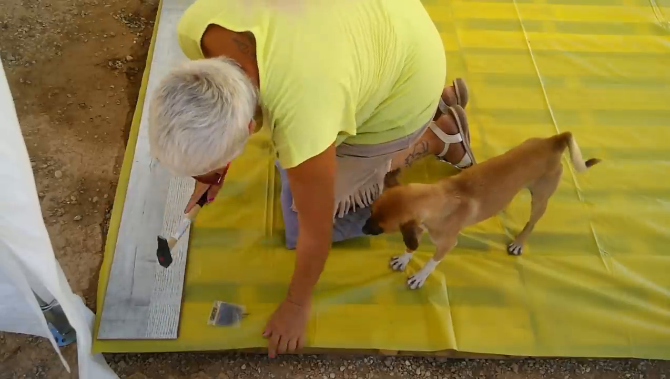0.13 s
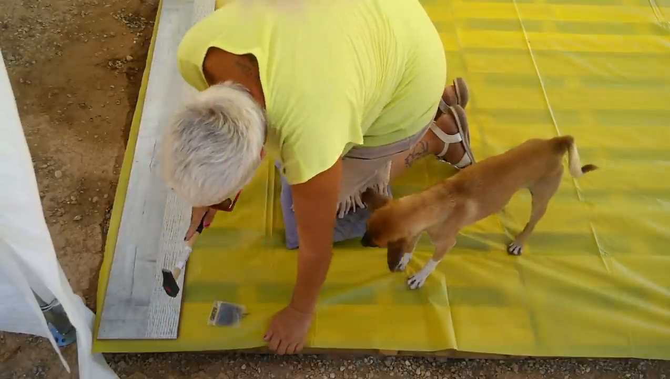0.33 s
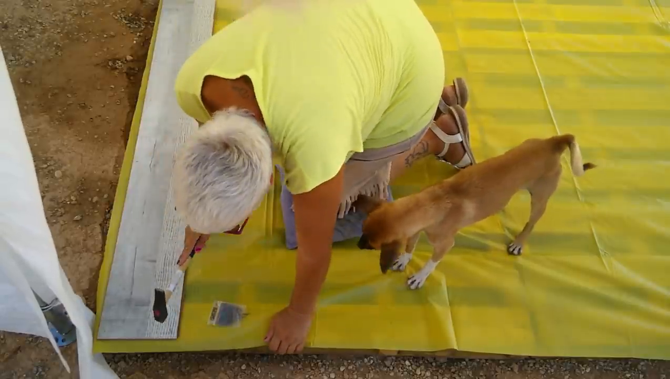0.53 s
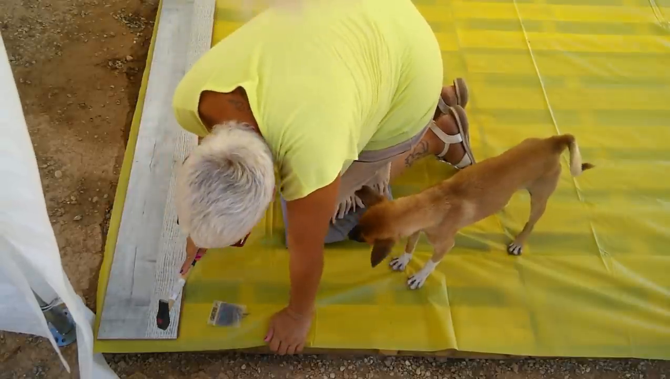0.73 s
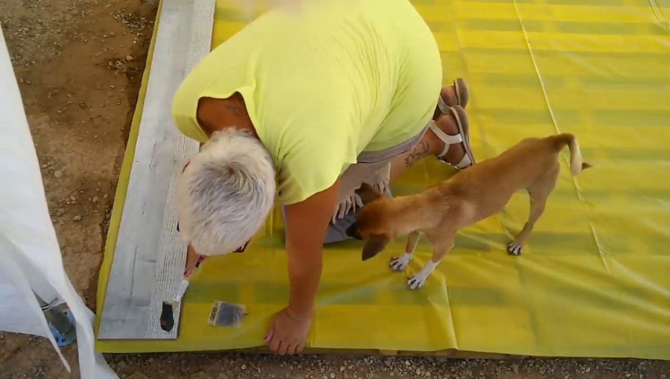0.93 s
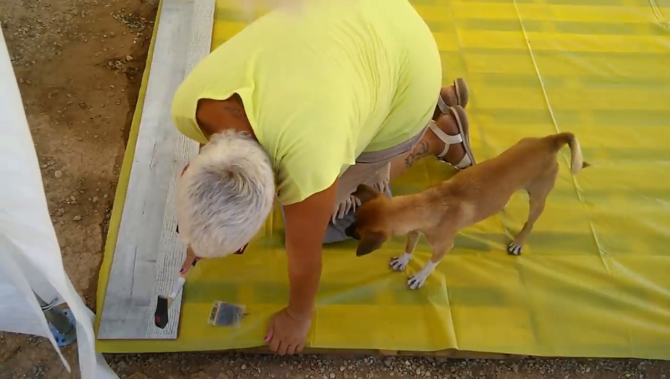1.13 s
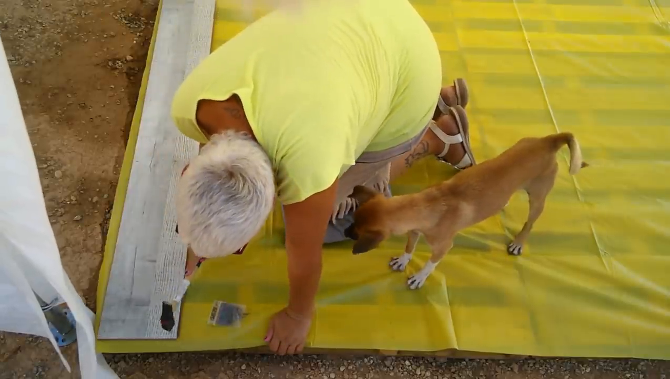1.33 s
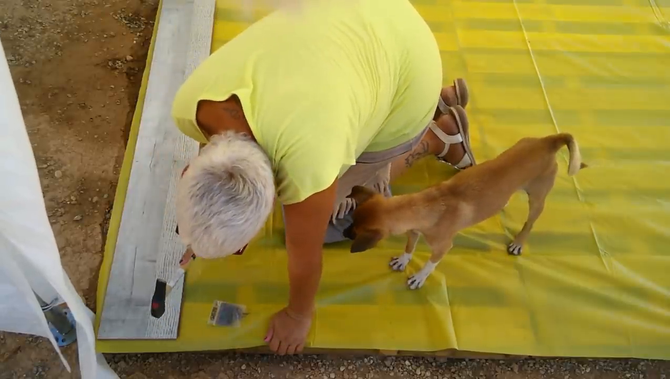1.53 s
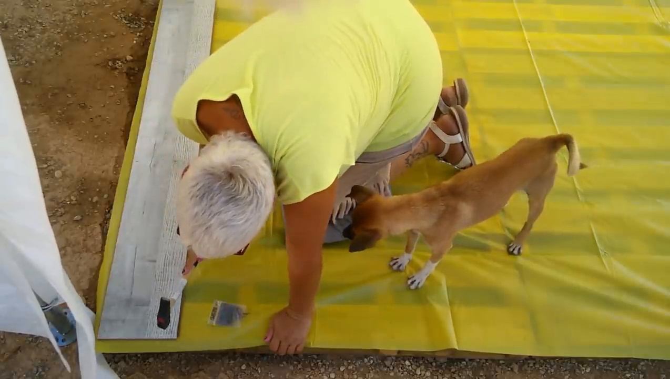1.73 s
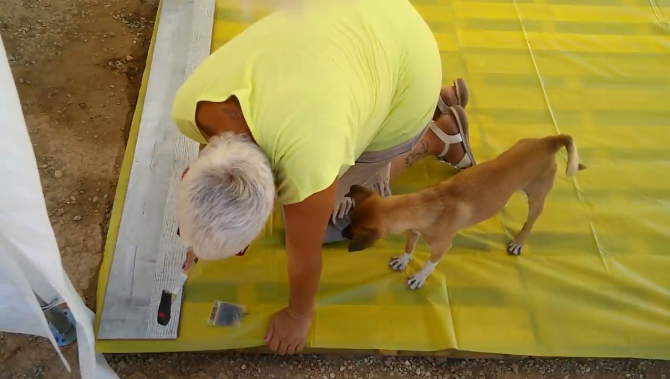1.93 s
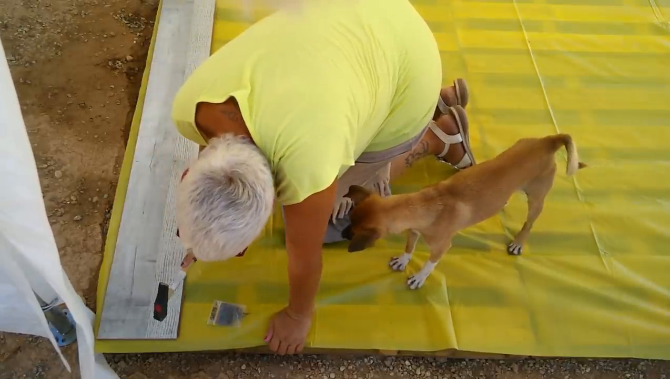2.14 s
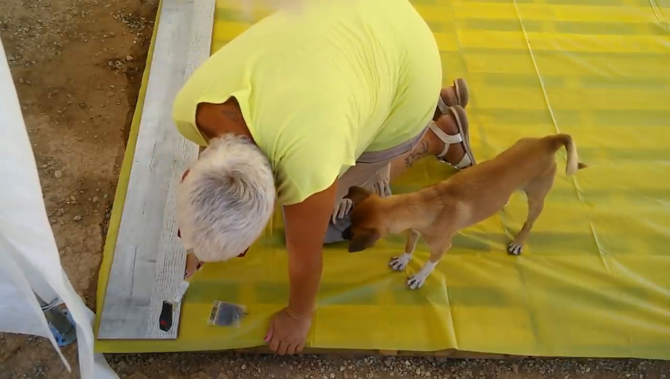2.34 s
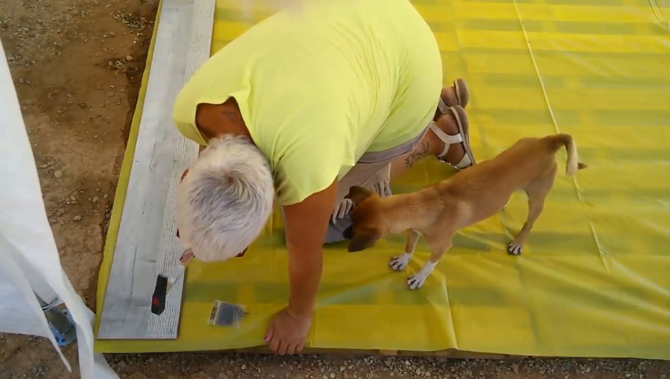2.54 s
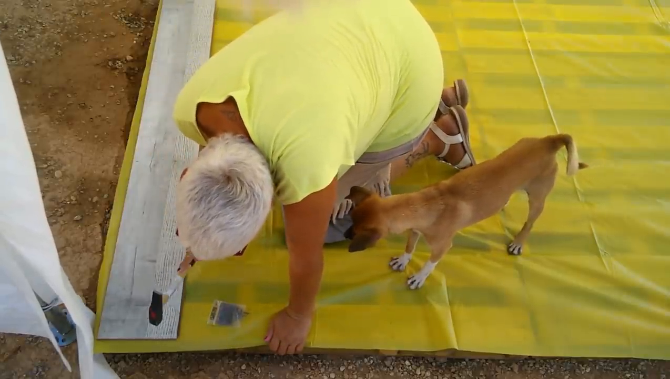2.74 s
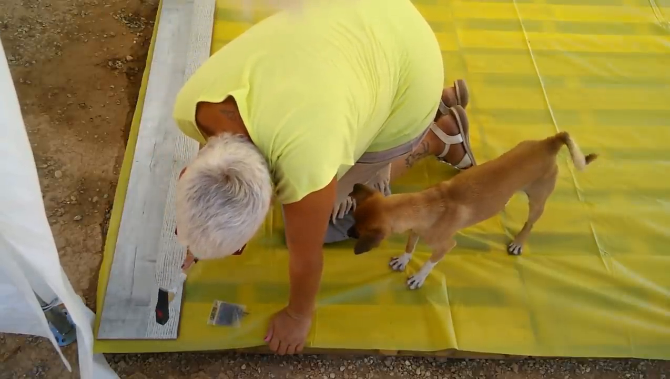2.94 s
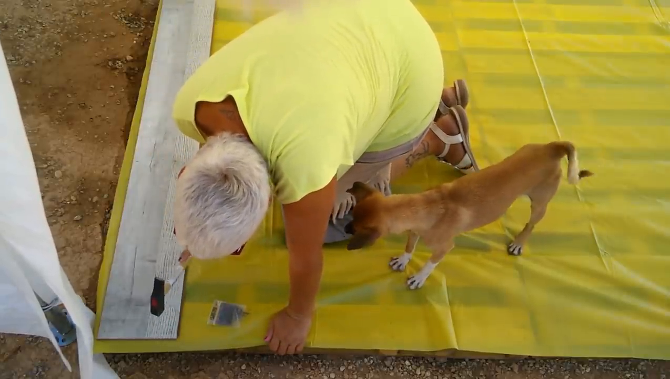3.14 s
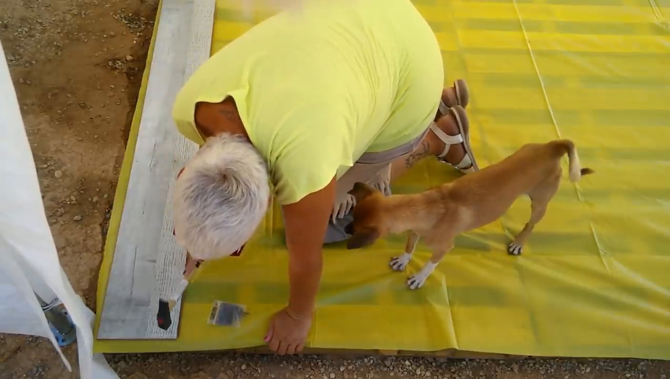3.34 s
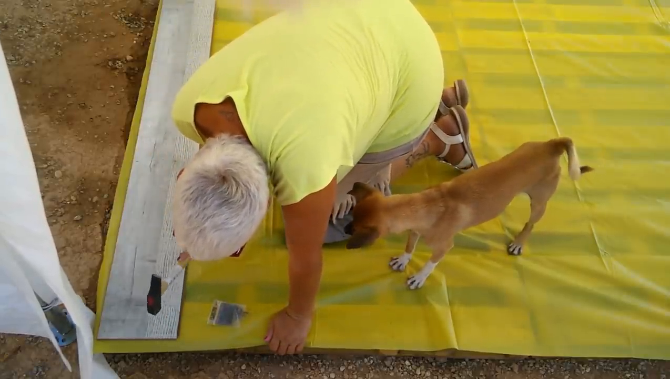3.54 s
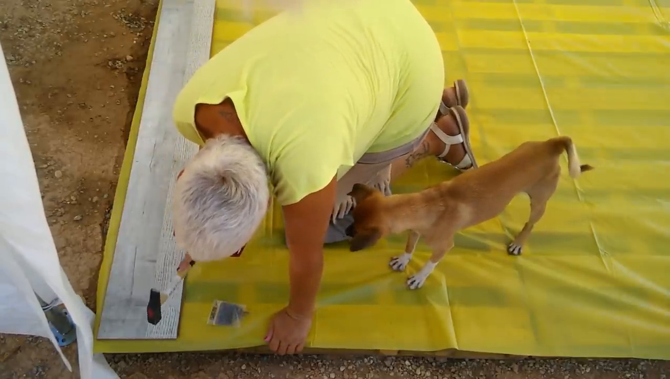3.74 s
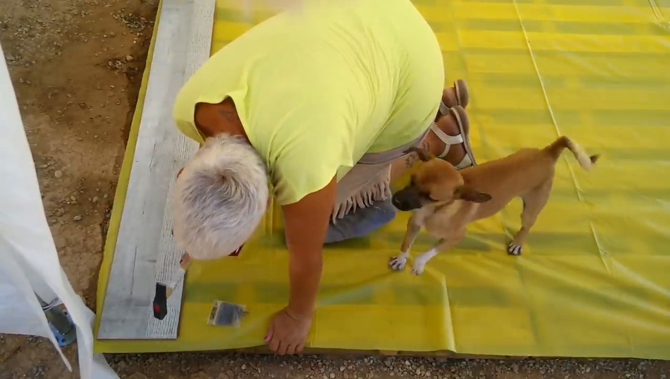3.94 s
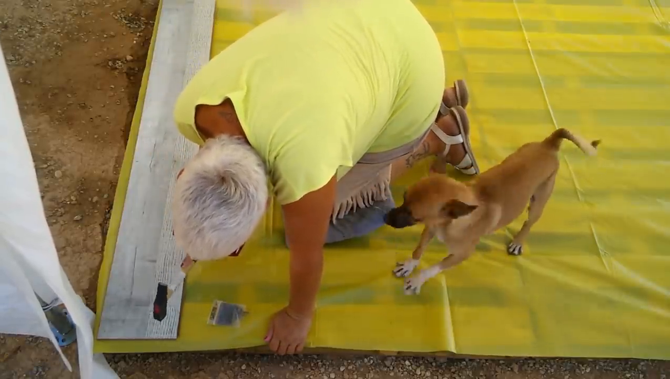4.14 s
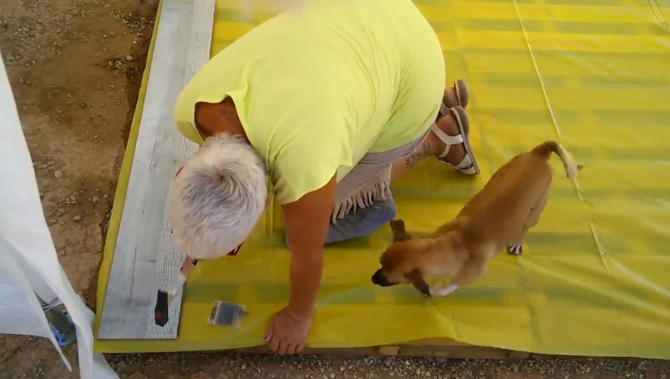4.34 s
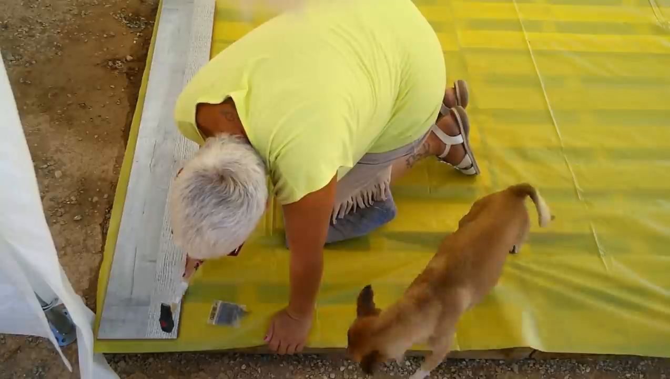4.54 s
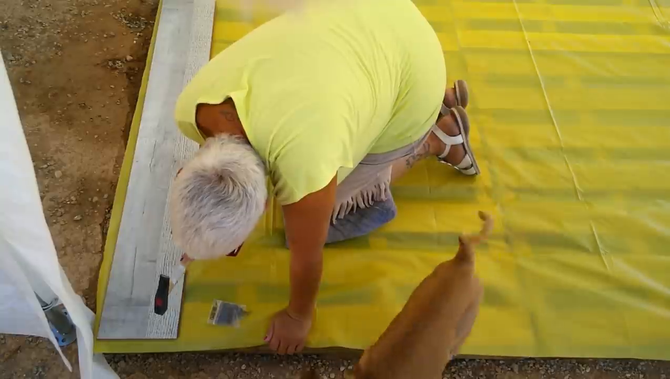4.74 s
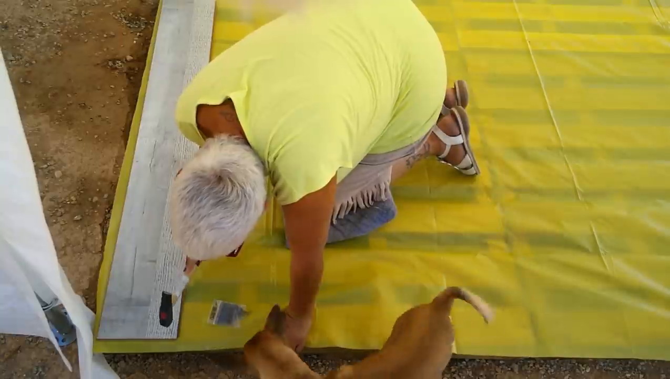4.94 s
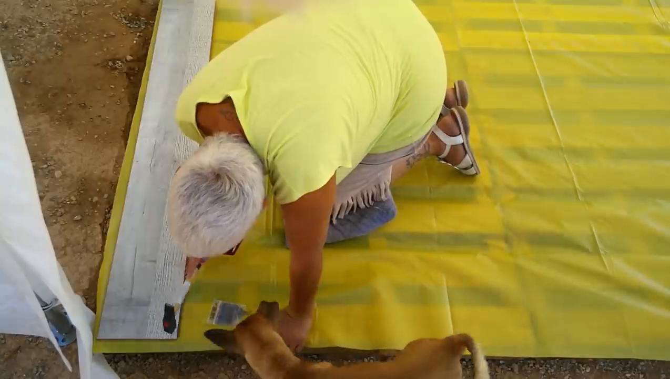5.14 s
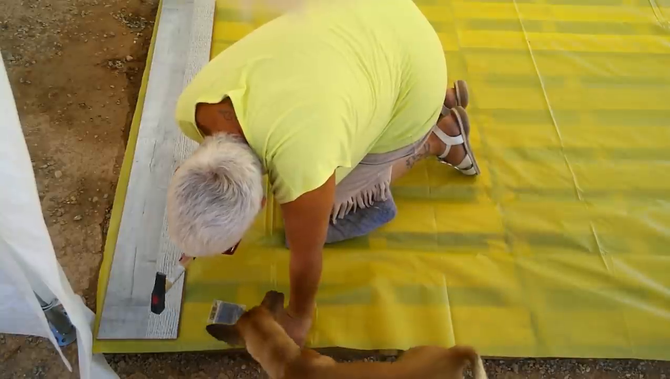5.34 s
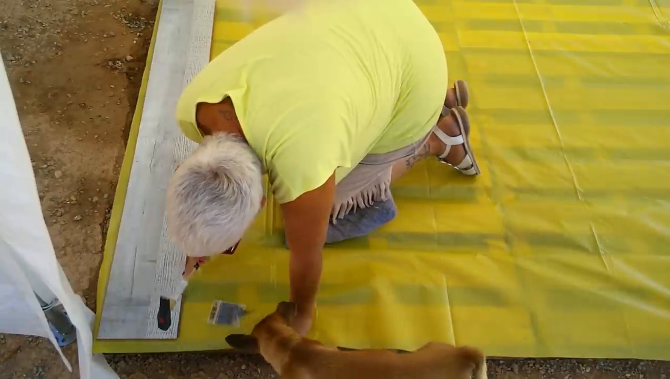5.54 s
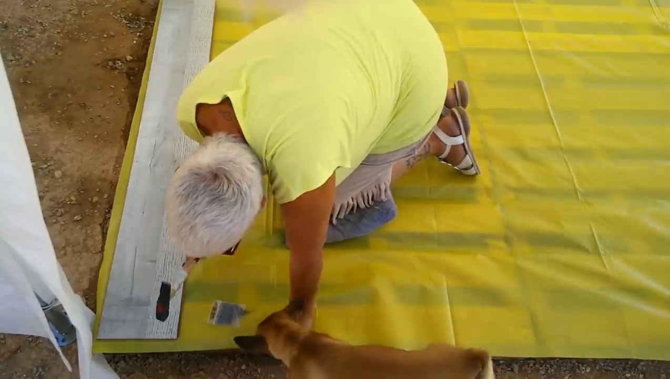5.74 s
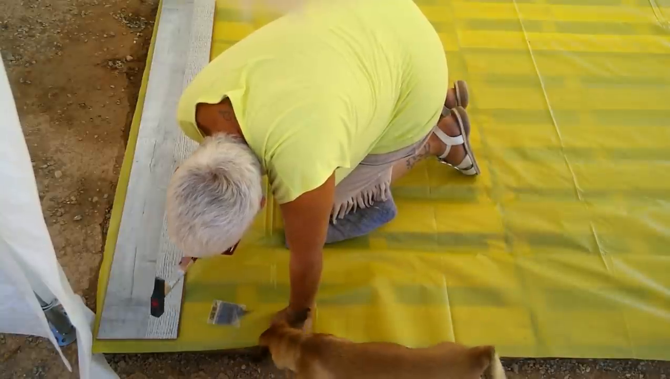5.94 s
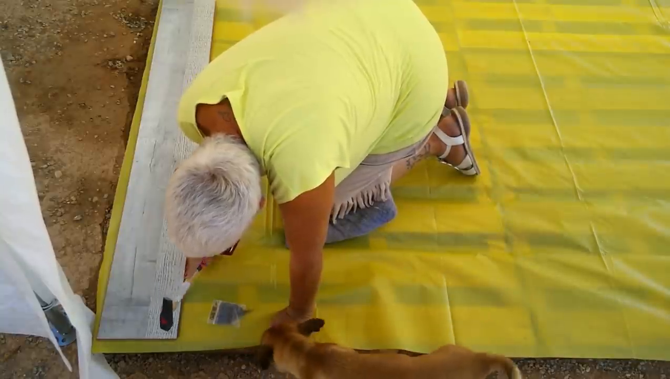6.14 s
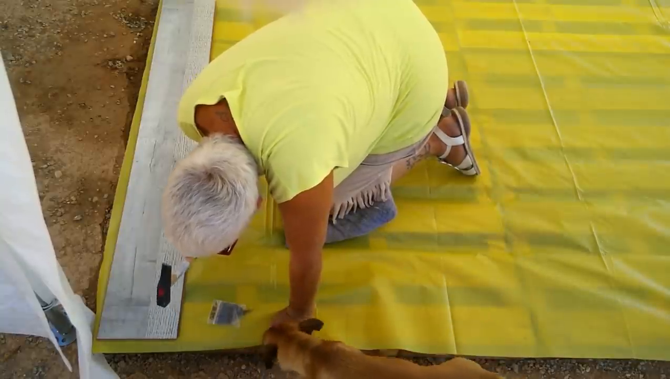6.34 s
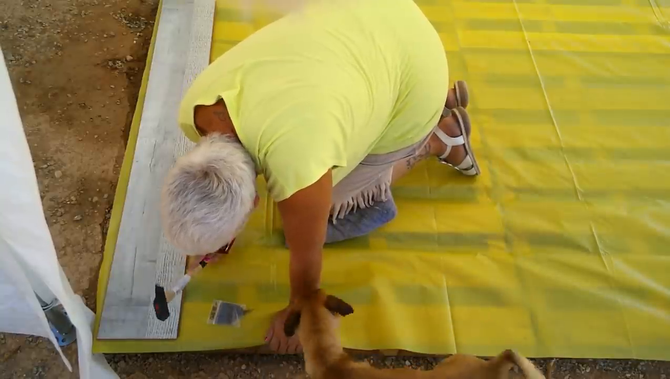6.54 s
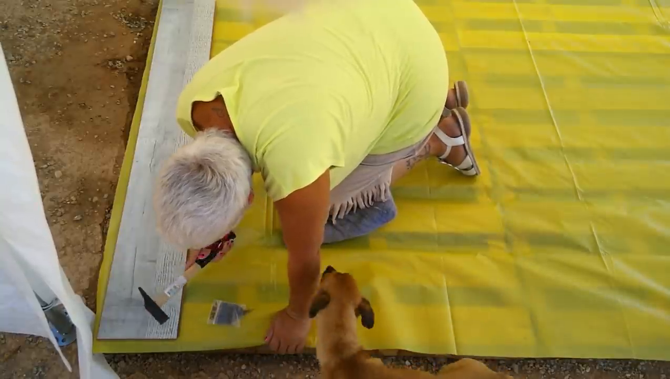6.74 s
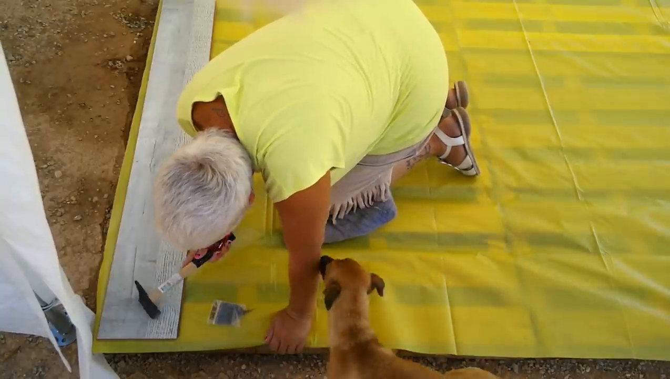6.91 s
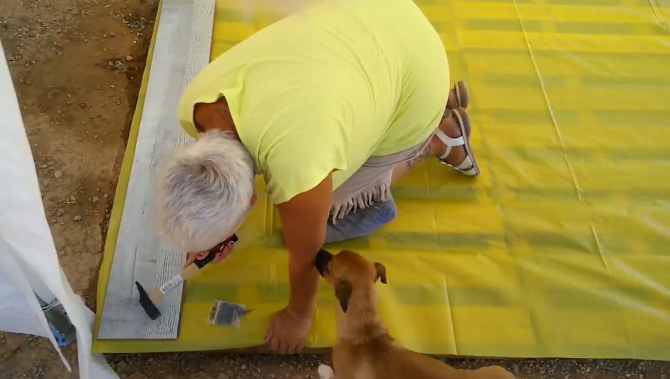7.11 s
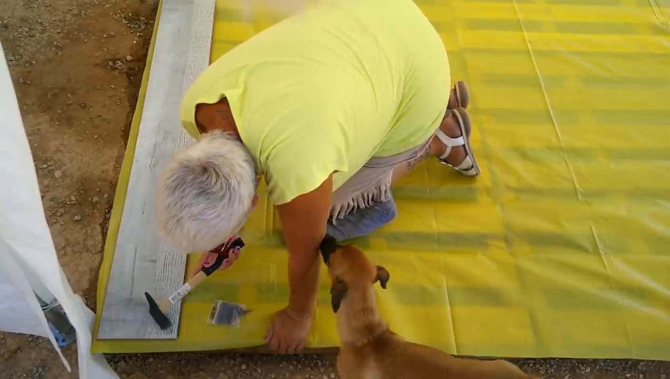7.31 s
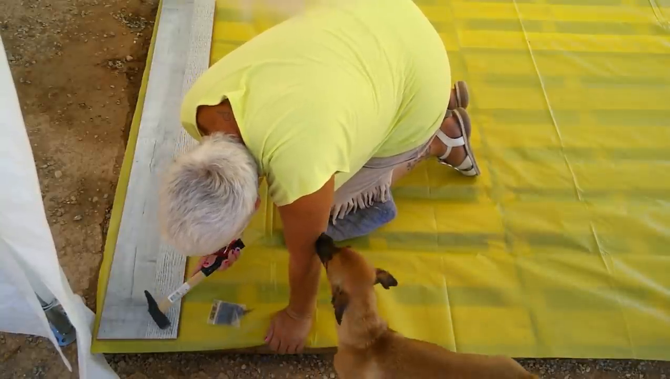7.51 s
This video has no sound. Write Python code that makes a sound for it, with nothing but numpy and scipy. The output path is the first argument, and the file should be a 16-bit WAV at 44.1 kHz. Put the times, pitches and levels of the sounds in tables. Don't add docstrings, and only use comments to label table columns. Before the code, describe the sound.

Loud, dry hammer blows on a long board, evenly spaced with brief gaps, over soft tarpaulin scuffs, faint bird pipes and quiet open air.

```python
import sys
import numpy as np
from scipy import signal
from scipy.fft import rfft, irfft, next_fast_len
from scipy.io import wavfile
from scipy.ndimage import uniform_filter1d, map_coordinates

SR = 44100
rng = np.random.default_rng(int(sys.argv[2]) if len(sys.argv) > 2 else 0)


def generate_wav(sig):
    pcm = np.round(np.clip(np.atleast_2d(sig).T, -1, 1) * 32767).astype(np.int16)
    wavfile.write(sys.argv[1], SR, pcm)


def field_ratio(decibels):
    return 10 ** (np.asarray(decibels, dtype=float) / 20)


N = 338247
SPAN = 2 ** 14

# (frequency [Hz], level [dB], t60 [s])
PLANK_MODES = [(256.4, -11, 0.2), (283, -16.5, 0.11), (360, -11.5, 0.23), (423.7, -14.5, 0.24),
               (522.4, 0.5, 0.067), (570.7, -3, 0.19), (778.7, -1.5, 0.13), (916.5, 2, 0.062),
               (1022.4, -4, 0.025), (1113.7, -6, .06), (1380, -10, .06), (1652, -12.5, .07),
               (1883, -18, .07), (2128, -11.5, 0.038)]
# (frequency [Hz], density [dB per Hz])
CRINKLE_COLOUR = [(3000, -41.5), (5000, -10.5), (7200, 7), (10000, -7), (16000, -19.5)]


def unit(x):
    return x / np.sqrt(np.mean(x ** 2) + 1e-20)


def along(points, hz):
    f, v = np.transpose(points)
    return np.interp(np.log(hz + 1), np.log(f + 1), v)


def filtered(x, response):
    m = 2 * next_fast_len(x.shape[-1] // 2 + 4096)
    return irfft(rfft(x, m) * response(np.fft.rfftfreq(m, 1 / SR)), m)[..., :x.shape[-1]]


def hiss(colour, size):
    return unit(filtered(rng.standard_normal(size), lambda hz: field_ratio(along(colour, hz))))


def causal(gain):
    c = irfft(np.log(gain + 1e-6))
    c[1:len(c) // 2] *= 2
    c[len(c) // 2:] = 0
    return np.exp(rfft(c))


def open_air():
    # (frequency [Hz], density [dB per Hz])
    air_colour = [(15, -20.5), (30, -0.5), (55, -6), (120, -8.5), (220, -15.5), (500, -19), (1000, -20.5),
                  (2000, -28.5), (3200, -36.5), (7000, -43), (16000, -58.5)]
    level_db = -54.5
    z = signal.stft(hiss(air_colour, N + 512), nperseg=512)[2]
    patches = uniform_filter1d(rng.standard_normal(z.shape), 6, 0)
    patches = uniform_filter1d(patches, 14, 1)
    return field_ratio(level_db) * signal.istft(z * field_ratio(0.5 * unit(patches)), nperseg=512)[1][:N]


def sheet():
    # (time [s], peak [dB], crispness [dB], t60 [s])
    scuffs = [(.133, -41.5, -22, 0.13), (.167, -49, -10, .06), (.326, -46, -19, .035),
              (.384, -50, -22, .04), (2.01, -47, -19, .03), (2.355, -46, -21, .05),
              (3.88, -42, -15.5, 0.047), (3.989, -42, -16, 0.063), (4.015, -45, -16, 0.063),
              (4.177, -29, -23, .15), (4.213, -15, -30, .15), (4.224, -12, -26, 0.012),
              (4.24, -14.5, -40, .02), (4.381, -31.5, -19, 0.07), (4.405, -29.5, -37, 0.14),
              (4.437, -21.5, -42, 0.019), (4.451, -32.5, -32, 0.057), (4.475, -31.5, -30, 0.02),
              (4.516, -47, -28, 0.032), (4.814, -35.5, -23, 0.047), (4.846, -37.5, -26, .09),
              (4.868, -44, -26, .24), (5.995, -45, -21, 0.03), (6.778, -44, -30, .055),
              (7.275, -42, -22, .042), (7.569, -46.5, -10, 0.039)]
    # (start [s], length [s], peak [dB], crispness [dB])
    drags = [(0.133, 0.28, -58, -14.5), (4.331, 0.46, -41.5, -26.5), (6.461, 0.23, -56.5, -24),
             (7.546, 0.086, -56.5, -17)]
    # (frequency [Hz], density [dB per Hz])
    sheet_colour = [(100, -34.5), (250, 0), (600, -1), (1500, -5.5), (2500, -10), (3500, -16),
                    (6000, -37.5)]
    crease_hz, crease_spread = 900, .4
    rise, fall = 0.32, 0.41
    t = np.arange(N) / SR
    body, treble, crease = np.zeros(N), np.zeros(N), np.zeros(N)
    for (s, db, crisp_db, t60), chance in zip(scuffs, rng.standard_normal(len(scuffs))):
        k = round(s * SR)
        age = t[:min(SR // 5, N - k)]
        puff = field_ratio(db - 3.0 - 60 * age / max(t60, .005)) * (1 - np.exp(-age / 0.00046))
        pitch = crease_hz * np.exp(crease_spread * chance)
        body[k:][:len(age)] += puff
        treble[k:][:len(age)] += puff * field_ratio(crisp_db)
        crease[k:][:len(age)] += puff * field_ratio(-60 * age / 0.032) * np.sin(2 * np.pi * pitch * age)
    clumps = map_coordinates(rng.standard_normal(int(N * 90 / SR) + 4), [t * 90])
    for s, length, db, crisp_db in drags:
        part = (t - s) / length
        swell = np.clip(np.minimum(part / rise, (1 - part) / fall), 0, 1)
        drag = swell * field_ratio(db + 3.3 * clumps)
        body += drag
        treble += drag * field_ratio(crisp_db)
    return body * hiss(sheet_colour, N) + treble * hiss(CRINKLE_COLOUR, N) + 1.1 * crease


def bird():
    # (time [s], length [s], pitch [Hz], level [dB])
    pipes = [(0.187, 0.034, 2200, -59), (0.29, 0.05, 2180, -56), (0.447, .1, 1860, -62),
             (0.656, .05, 1880, -62), (0.722, 0.05, 1910, -60.5)]
    t, out = np.arange(N) / SR, np.zeros(N)
    for s, length, hz, db in pipes:
        swell = np.sin(np.pi * np.clip((t - s) / length, 0, 1))
        waver = 1.7 * np.sin(2 * np.pi * 14 * (t - s))
        out += field_ratio(db) * swell * np.sin(2 * np.pi * hz * t + waver)
    return out


def bending(spot, t, hz):
    # (air delay [s], dispersion [s Hz^.5], level [dB])
    arrivals = [(.0004, .05, -3), (.0008, .12, 2), (.003, .16, 3), (.008, .18, 4.5)]
    # (frequency [Hz], level [dB])
    crack_colour = [(60, -30.5), (200, -15), (400, -11.5), (530, -3), (680, -3), (950, 4), (1400, -4.5),
                    (2300, -3.5), (3500, -9.5), (6000, -30), (16000, -28.5)]
    loss_db, scatter_s, dull_hz = 600.5, .0004, 7050
    waves = 0
    for (delay, bend, db), late in zip(arrivals, scatter_s * rng.standard_normal(len(arrivals))):
        shifted = delay * (1 + late / .008)
        phase = hz * (shifted - bend / 63) + 2 * bend * np.sqrt(hz)
        travel = np.exp(-2j * np.pi * phase - hz / dull_hz * shifted / 0.01)
        waves = waves - field_ratio(db - loss_db * delay * spot) * travel
    waves = irfft(waves * field_ratio(along(crack_colour, hz)), SPAN)
    return field_ratio(-21) * unit(waves) * np.minimum(t / 0.00092, 1) * field_ratio(-60 * (t / 0.039) ** 2)


def knock(pitch, t):
    level_db, t60 = 7.5, .018
    tone = lambda ratio: np.sin(2 * np.pi * ratio * pitch * t)
    slower = field_ratio(40 * np.minimum(t, .2) / t60)
    partials = tone(1) + 0.45 * tone(1.7) + 0.24 * slower * tone(.45)
    return -field_ratio(level_db - 60 * t / t60) * (1 - np.exp(-t / 0.0011)) * partials


def plank_ring(t):
    return np.array([(-1) ** k * field_ratio(db - 60 * t / t60) * np.sin(2 * np.pi * f * t)
                     for k, (f, db, t60) in enumerate(PLANK_MODES)])


def wash():
    # (frequency [Hz], density [dB per Hz])
    wash_colour = [(80, -36), (200, -1.5), (400, -1), (800, -3), (1300, -15), (2300, -12.5), (3400, -23),
                   (7000, -50), (16000, -55.5)]
    # (frequency [Hz], t60 [s])
    fade = [(160, 0.12), (420, .14), (1100, 0.16), (2900, 0.19), (5000, 0.55), (7500, 0.18)]

    def gather(f):
        near_modes = sum(1 / (1 + ((f - c) / 22) ** 2) for c, _, _ in PLANK_MODES)
        return np.sqrt(0.19 + near_modes + 0.3 * (f > 1300))

    hz, t, z = signal.stft(unit(filtered(hiss(wash_colour, SPAN), gather)), SR, nperseg=256)
    return signal.istft(z * field_ratio(-60 * (t - .04) / along(fade, hz)[:, None]), SR, nperseg=256)[1][:SPAN]


def rattle(t):
    clumps = map_coordinates(rng.standard_normal(int(t[-1] * 220) + 4), [t * 220])
    jumps = field_ratio(4.5 * clumps - 60 * t / .14) * (1 - np.exp(-(t / .013) ** 2))
    return jumps * hiss(CRINKLE_COLOUR, SPAN)


def frame_hum(age):
    # (frequency [Hz], level [dB], t60 [s])
    frame_modes = [(70.2, -47.5, 2.3), (64.6, -53, 0.39), (100, -36, 0.45), (110.9, -40, 0.51),
                   (138, -29, .3), (147.16, -37.5, 0.53), (164, -64.5, 6.3), (183.8, -42, .45),
                   (271, -56.5, 0.65), (281, -57.5, 0.43)]
    hum = np.array([field_ratio(db - 60 * age / t60) * np.sin(2 * np.pi * f * age) for f, db, t60 in frame_modes])
    return hum * (1 - np.exp(-age / 0.0025)) * np.cos(np.pi / 2 * age / age[-1])


def contact(db, edge_db, sharp_db, hz):
    tilt = [(200, 0.67 * min(db + 8.5, 0)), (450, 0.0047), (1300, 0),
            (2400, edge_db), (3300, edge_db), (5000, sharp_db)]
    return causal(field_ratio(along(tilt, hz))) * 1j * hz / (150 + 1j * hz)


def hammer():
    # (time [s], strength [dB], hardness of contact [dB], spot along the board [rad])
    strikes = [(1.094, -8.5, -13, 0.83), (1.409, -0.44, -3.5, .7), (1.729, 1, -7.5, .8),
               (2.037, 3, -4.5, .21), (2.368, 2, -6, .23), (2.698, 2, -4.5, .3), (3.035, 1.55, -2.5, .3),
               (3.351, 2.5, -2.1, .05), (3.685, 4, 7.5, .8), (4.253, 3.5, -3.5, -.05),
               (4.589, 2.5, -1.5, -.01), (4.897, 2.5, -2, -.1), (5.2, 3.5, -3, -.2), (5.517, 2.5, 0, -.2),
               (5.842, 2, 1, -.2), (6.174, 3, 0.5, -0.34)]
    # (time [s], strength [dB], hardness [dB], knock pitch [Hz])
    nudges = [(3.968, -34.5, -4, 594), (4.491, -24, -15.5, 615.4), (6.834, -48.5, -2, 1170),
              (6.9108, -14, -7.5, 850), (7.253, -15.5, -14.5, 714), (7.576, -40.5, -13.5, 480)]
    tap_spot, tap_ring_db, tap_waves_db = 2.25, 0.5, -2.5
    out, t, hz = np.zeros(N + 2 * SR), np.arange(SPAN) / SR, np.fft.rfftfreq(SPAN, 1 / SR)
    age = np.arange(2 * SR) / SR
    onset = (1 - np.exp(-t / .002)) * np.cos(np.pi / 2 * t / t[-1])
    modes, hum = plank_ring(t), frame_hum(age)
    near, far = wash(), wash()
    shape = rng.normal(0, 1, (2, len(modes)))
    blows = []
    for s, db, hard, spot in strikes:
        edge_db = 0.5 + 0.33 * hard - .74 * db
        ring_db = -2 + 0.6354 * s
        blows.append((s, db, edge_db, hard, ring_db, spot, bending(spot, t, hz)))
    for s, db, hard, pitch in nudges:
        first = field_ratio(tap_waves_db) * bending(tap_spot, t, hz) + knock(pitch, t)
        blows.append((s, db, hard, hard, tap_ring_db, tap_spot, first))
    for s, db, edge_db, sharp_db, ring_db, spot, first in blows:
        drift_db = 2.7 * (np.cos(spot) * shape[0] + np.sin(spot) * shape[1])
        weight = field_ratio(drift_db + rng.normal(0, 1.8, len(modes)))
        dense = np.cos(spot) * near + np.sin(spot) * far + 0.43 * wash()
        ring = field_ratio(ring_db) * onset * (field_ratio(-12.5) * weight @ modes + field_ratio(-23.5) * dense)
        struck = irfft(rfft(first + ring) * contact(db, edge_db, sharp_db, hz), SPAN)
        grit = field_ratio(db - 41.0 + 0.4 * sharp_db) * onset * rattle(t)
        start = round((s - 0.0002) * SR)
        out[start:][:SPAN] += field_ratio(db) * struck + grit
        shake_db = 1.4 * db + 8.5
        out[start:][:len(age)] += field_ratio(shake_db + rng.normal(0, 1.5, len(hum))) @ hum
    return out[:N]


def scene():
    return (open_air() + sheet() + bird() + hammer())[None]


def smear(x):
    length_s, level_db = .006, -29
    t = np.arange(round(length_s * SR)) / SR
    ahead = rng.standard_normal(len(t)) * field_ratio(-14 * t / length_s)
    ahead = ahead[None] / np.linalg.norm(ahead)
    spread = signal.fftconvolve(x[:, ::-1], ahead, axes=1)[:, :N][:, ::-1]
    return x + field_ratio(level_db) * spread


def low_pass(x):
    return signal.sosfilt(signal.butter(12, 16830, fs=SR, output="sos"), x)


def record(dry):
    # (frequency [Hz], level [dB])
    housing = [(20, 0.5), (3200, -0.5), (4100, -11), (4900, -13.5), (5800, -5), (7200, -0.5), (8300, -8),
               (9300, -20), (16000, -17.5)]
    clip_level, shelf_gain = .68, field_ratio(-13)
    heard = filtered(dry, lambda hz: causal(field_ratio(along(housing, hz))))
    flat = heard / (1 + np.abs(heard / clip_level) ** 30) ** (1 / 30)

    def shelf(hz):
        top = shelf_gain + (1 - shelf_gain) / (1 + (hz / 8400) ** 24)
        return top * (hz < 16700) * 1j * hz / (22 + 1j * hz)

    return low_pass(filtered(smear(flat), shelf))


dry = scene()
out = record(dry)
generate_wav(out)
```